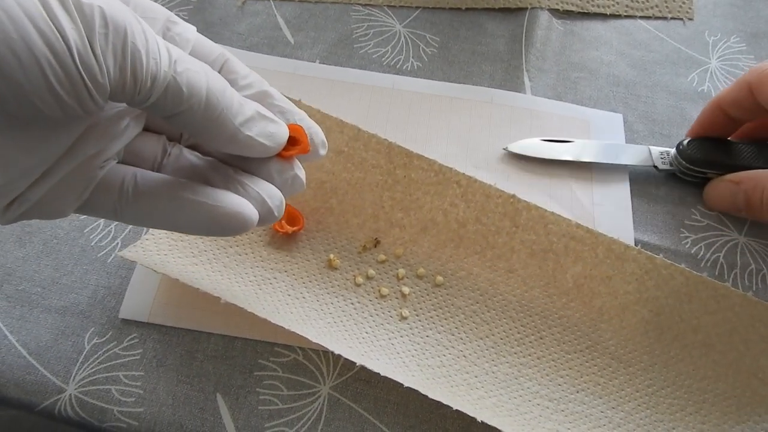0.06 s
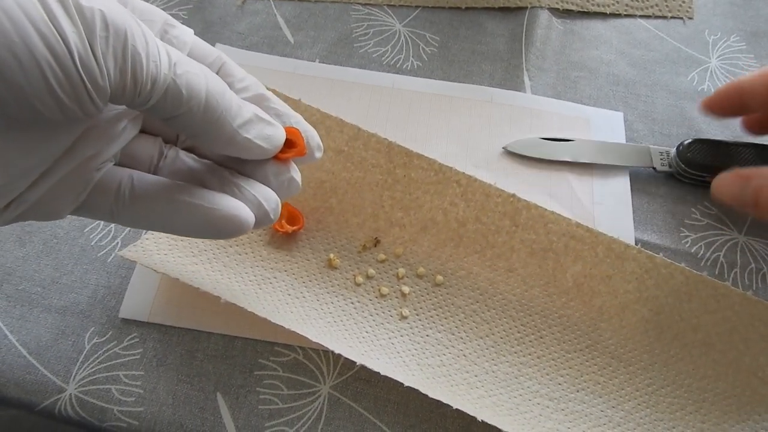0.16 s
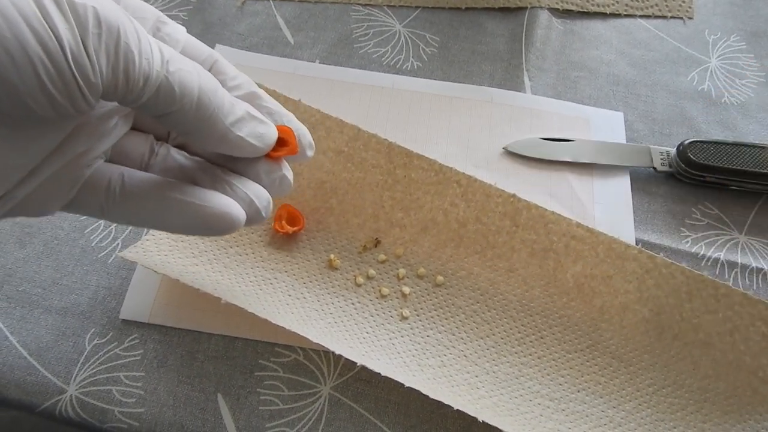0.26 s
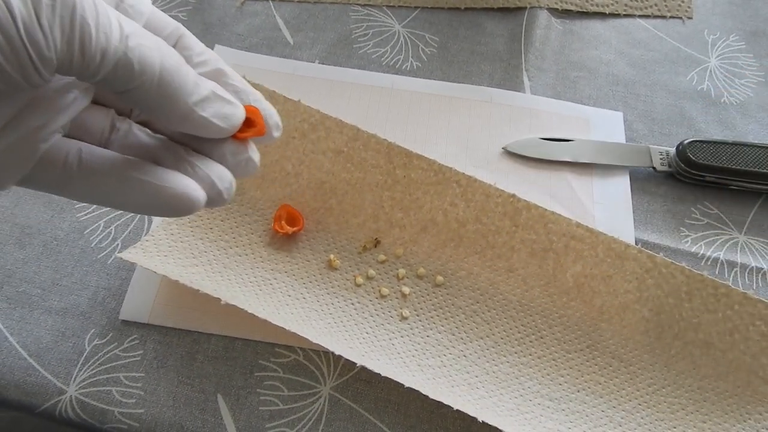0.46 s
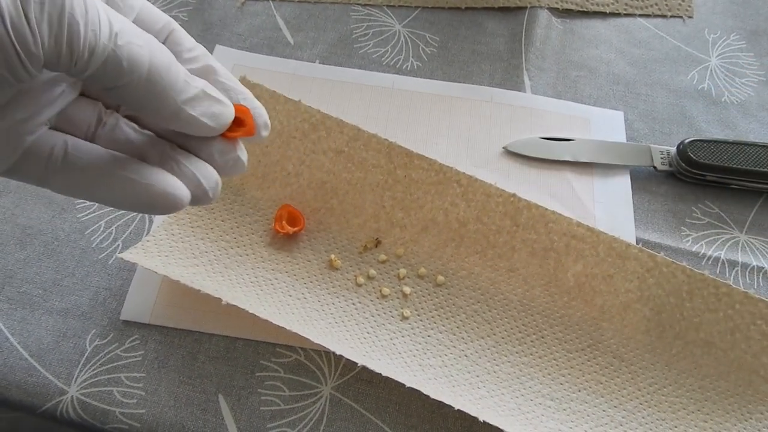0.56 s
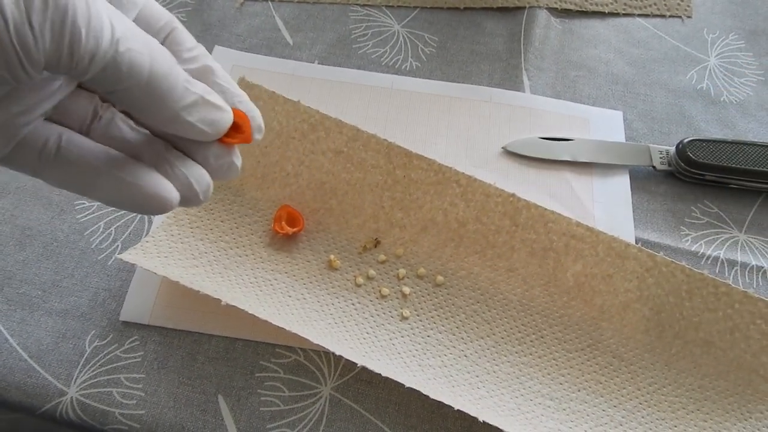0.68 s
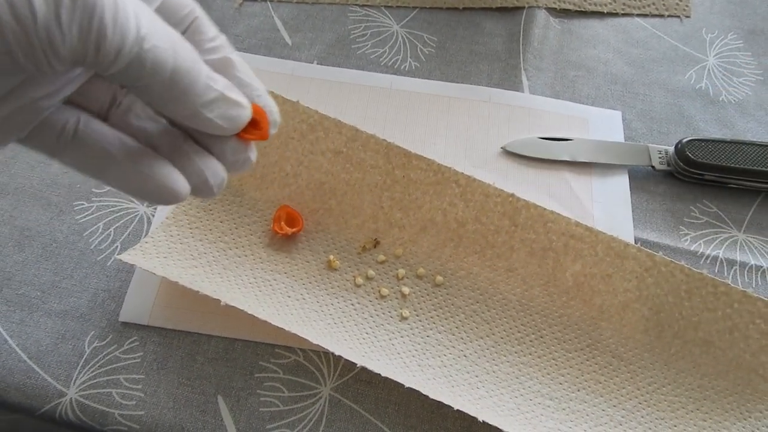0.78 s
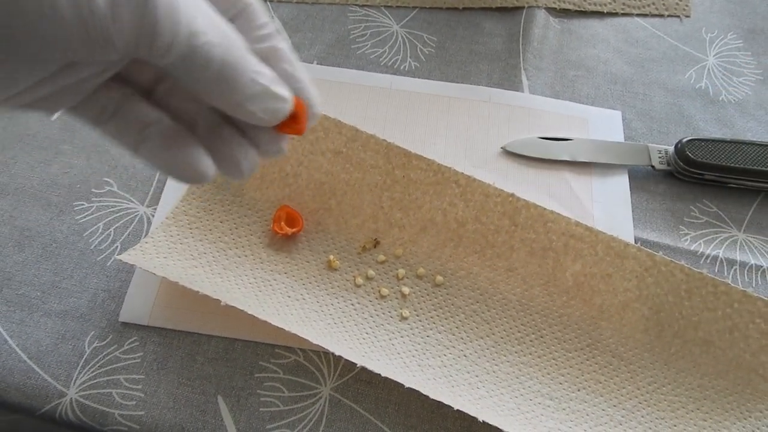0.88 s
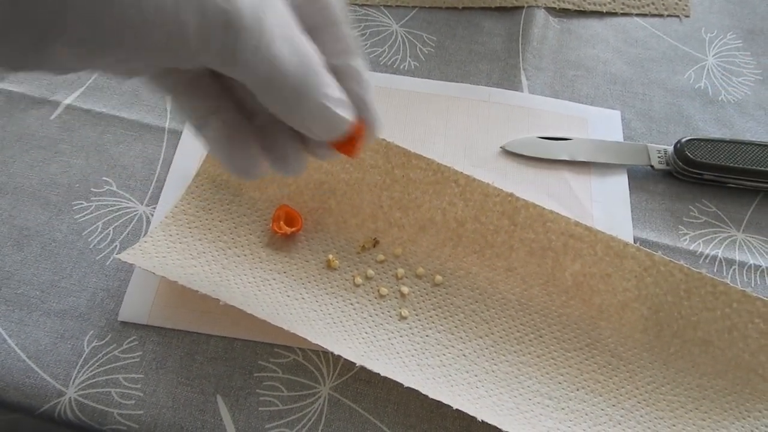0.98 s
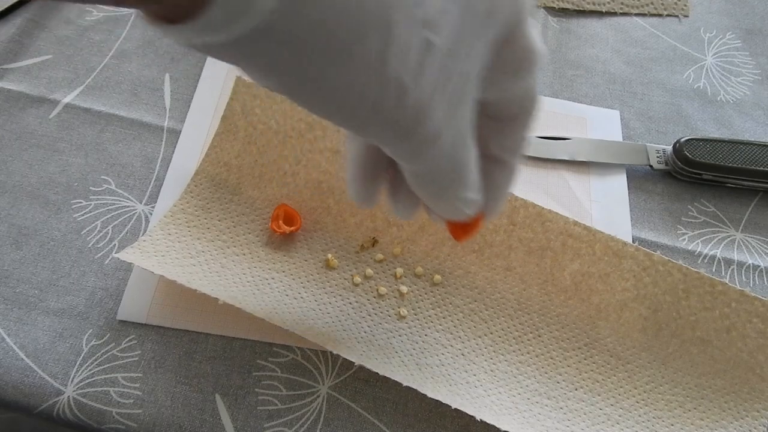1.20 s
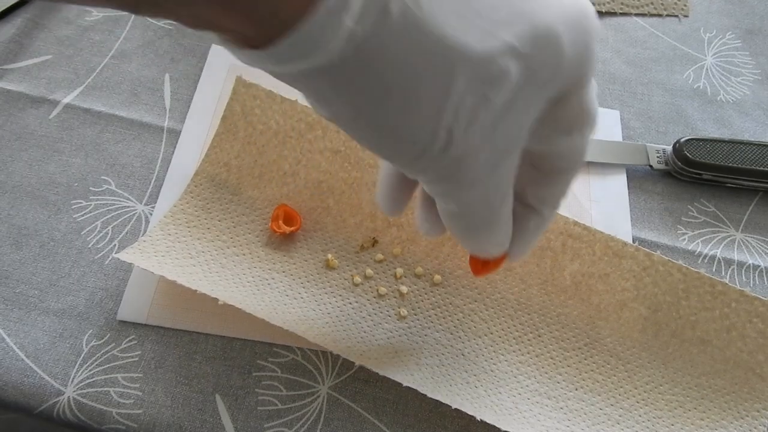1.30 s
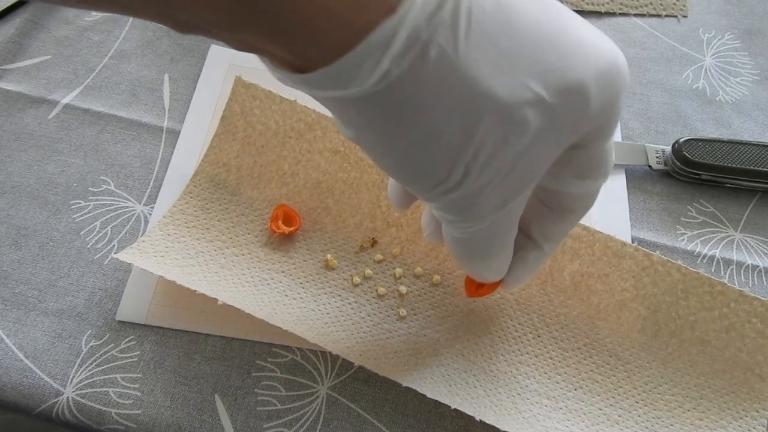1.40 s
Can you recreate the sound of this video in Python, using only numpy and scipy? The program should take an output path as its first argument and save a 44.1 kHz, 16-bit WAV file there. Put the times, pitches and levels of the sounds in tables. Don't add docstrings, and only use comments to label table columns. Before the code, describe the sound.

A folding knife is put down on a cloth-covered wooden table indoors. Light low bumps at 0.05 s, then a hard drop at 0.22 s with rapid rebounds, booming through the microphone's stand and overloading, with short metallic ticks. The low boom fades quickly into a brief room tail. Tiny glove creaks follow from 0.3 to 0.7 s, then quiet hiss, with soft rustling rising after 1.35 s.

```python
import sys
import numpy as np
from scipy import signal
from scipy.io import wavfile

SR = 44100
rng = np.random.default_rng(int(sys.argv[2]) if len(sys.argv) > 2 else 0)


def put_to_file(sound):
    columns = np.atleast_2d(sound).T
    safe = np.clip(columns, -1, 1)
    whole_steps = np.round(safe * 32767)
    wavfile.write(sys.argv[1], SR, whole_steps.astype(np.int16))


def field_ratio(decibels):
    return 10 ** (np.asarray(decibels, dtype=float) / 20)


N = 63945

# (frequency [Hz], level [dB per Hz])
HISS_COLOUR = [(20, -8.5), (40, -4.5), (100, -5.5), (300, -12), (800, -19), (2500, -27), (7000, -32.5),
               (16000, -35.5)]
# (frequency [Hz], likeness [0 to 1])
LEFT_RIGHT_LIKENESS = [(25, .9), (200, 0), (700, 0.066), (2000, .2), (6000, .05), (15000, 0.0)]
# (time [s], level [dB])
HAND_LEVEL = [(0, -65), (.15, -61.5), (.45, -62.5), (.7, -64.5), (1.0, -80), (1.171, -70), (1.3, -69.5),
              (1.38, -57.5), (1.45, -55.5)]
# (frequency [Hz], level [dB per Hz])
RUB_COLOUR = [(30, -24.5), (100, -8.5), (250, -3), (500, 6.5), (1000, -5.5), (2000, -10.5), (4000, -18),
              (9000, -39)]
# (time [s], level [dB], pitch [Hz], pan [dB])
GLOVE_CREAKS = [(.304, -53, 2000, -0.5), (.434, -57, 1890, -8), (.46, -60, 2400, -2),
                (0.484, -56, 2030, -1), (0.525, -50.5, 2141, -9), (.56, -58, 2100, -3), (.6, -61, 2250, -3),
                (.65, -61, 2150, -10), (0.7228, -47.5, 2085, -13), (1.165, -58, 2150, 0.5),
                (1.382, -52.5, 1660, -3)]
# (frequency [Hz], level [dB])
ROOM_COLOUR = [(30, -46), (80, -42.5), (200, -43), (400, -43), (700, -63.5), (1200, -66), (3000, -66),
               (8000, -76)]
# (frequency [Hz], time to fall 60 dB [s])
ROOM_FADE = [(30, 1.2), (100, 0.55), (300, 0.83), (1000, 0.46), (3000, .25), (8000, .2)]
# (time [s], level [dB], pan [dB], dulling [dB per octave])
METAL_TICKS = [
    (.2160, -48, -5, -1.5),
    (.2190, -39.5, -5.5, -1.0),
    (.2252, -39.5, 1, 2),
    (.2310, -52.5, 1, 3.0),
    (.2368, -47.5, 1.5, 3.5),
]
# (frequency [Hz], level [dB], time to fall 60 dB [s])
METAL_TONES = [(650, 10.5, 0.037), (840, 7.5, .02), (1100, 5.5, .015), (1480, 0, 0.022),
               (2150, -9.5, 0.0087), (3240, -8.5, 0.019), (4136, -1.5, 0.011), (5430, 0.5, 0.0037),
               (6900, -7.5, .004), (8900, -4, 0.011), (9300, -7.5, .012), (12120, -14, .004)]
# (time [s], force [dB], direction [+1 push, -1 lift], contact length [ms])
HANDLE_CONTACTS = [
    (.0431, -14.5, 1, .6),
    (.0494, -19, -1, .8),
    (.069, -13, 1, 3.0),
    (.1896, -16, -1, 1.2),
    (.21577, 0, 1, .12),
    (.22216, -2.4, -1, .43),
    (.2324, -7.9, -1, .65),
    (.23635, -8.5, 1, .65),
]
# (frequency [Hz], level [dB], time to fall 60
# dB [s], polarity [+1 or -1], left-right share [-1 to 1])
BOOM_TONES = [(30.4, -35, 1.4, -1, -.03), (50.1, -26.5, .48, -1, 0), (76.8, -19, .6, 1, .23),
              (81.8, -11.1, .3, 1, -.01), (101.6, -5.9, .216, 1, -.1), (124.9, 3.5, .023, -1, -.09),
              (138.5, -11.1, .154, -1, -.25),
              (173.9, -7.9, 0.126, 1, -0.34), (214.9, -7.7, 0.081, -1, -0.02),
               (232.4, -27.0, 0.38, 1, -0.32), (255.6, -3.5, 0.103, -1, 0.24), (286.8, 7.2, 0.053, 1, 0.0),
               (339.6, 1.2, 0.046, -1, -0.04), (350.7, -10.1, 0.115, 1, -0.0),
               (419.1, -8.8, 0.091, 1, 0.04), (429.2, -4.1, 0.028, -1, -0.12),
               (607.8, -29.9, 0.104, 1, -0.81)]


def rms_one(x):
    return x / np.sqrt(np.mean(x ** 2) + 1e-20)


def at_hz(points, hz):
    table_hz, values = np.array(points).T[:2]
    return np.interp(np.log(hz), np.log(table_hz), values)


def pan(db):
    return field_ratio(np.array([[db / 2], [-db / 2]]))


def drift(rate):
    step = 40
    r = np.exp(-2 * np.pi * rate * step / SR)
    slow = signal.lfilter([1], [1, -2 * r, r * r], rng.standard_normal(N // step + 2002))
    slow = slow[2000:]
    return np.interp(np.arange(N) / step, np.arange(len(slow)), rms_one(slow))


def bands():
    edges = 20 * 2 ** np.arange(0, 10, .5)
    white = rng.standard_normal((2, 2, N + 8000))
    for k, (low, high) in enumerate(zip(edges, edges[1:])):
        sos = signal.butter(2, [low, min(high, 19000)], "band", fs=SR, output="sos")
        yield np.sqrt(low * high), signal.sosfilt(sos, white[k % 2])[:, 8000:]


def stereo(pair, alike):
    alike = np.clip(alike, 0, 1)
    middle, side = pair
    return np.sqrt(1 + alike) * middle + np.sqrt(1 - alike) * side * [[1], [-1]]


def shaped(spectrum, patchy_db, rate):
    out = 0
    for hz, pair in bands():
        level_db = at_hz(spectrum, hz) + patchy_db * drift(rate)
        out = out + field_ratio(level_db) * stereo(pair, at_hz(LEFT_RIGHT_LIKENESS, hz))
    return rms_one(out)


def click(s, db, soft_s):
    x = np.zeros(N)
    x[int(s * SR)] = field_ratio(db)
    r = np.exp(-1 / (soft_s * SR))
    return signal.lfilter([(1 - r) ** 2], [1, -2 * r, r * r], x)


def ring(force, hz, t60):
    r = field_ratio(-60 / (t60 * SR))
    w = 2 * np.pi * hz / SR
    return signal.lfilter([0, np.sin(w)], [1, -2 * r * np.cos(w), r * r], force + 1e-18)


def microphone_hiss():
    return field_ratio(-54.5) * shaped(HISS_COLOUR, patchy_db=.4, rate=8.0) * pan(-.4)


def room_tail():
    rise_s, alike = 0.0069, 0.87
    soft_loss_db_per_ms = 15.5
    earlier_s, earlier_db, earlier_dull_db = 0.002, -0.5, 5.5
    t, out = np.arange(N) / SR, 0
    for hz, pair in bands():
        ages = [(np.maximum(t - s, 0), db - soft_loss_db_per_ms * ms) for s, db, _, ms in HANDLE_CONTACTS]
        octaves_up = np.log2(max(hz / 100, 1))
        ages.append((t - earlier_s, earlier_db - earlier_dull_db * octaves_up))
        shape = 0
        for age, db in ages:
            fade = field_ratio(db - 60 * age / at_hz(ROOM_FADE, hz))
            shape = shape + fade * (1 - np.exp(-age / rise_s))
        out = out + field_ratio(at_hz(ROOM_COLOUR, hz)) * shape * stereo(rms_one(pair), alike)
    return out


def hand_rustle():
    hand_db = np.interp(np.arange(N) / SR, *np.transpose(HAND_LEVEL))
    return field_ratio(hand_db) * shaped(RUB_COLOUR, patchy_db=5.5, rate=5.0)


def glove_creaks():
    rise_s, t60_s = 0.0012, 0.015
    t, out = np.arange(N) / SR, 0
    for s, db, hz, side_db in GLOVE_CREAKS:
        age = np.maximum(t - s, 0)
        swell = 1 - np.exp(-age / rise_s)
        fade = field_ratio(db + 6 - 60 * age / t60_s)
        out = out + pan(side_db) * fade * swell * np.sin(2 * np.pi * hz * age)
    return out


def blade():
    mix_db = rng.normal(0, 1.5, (len(METAL_TICKS), len(METAL_TONES)))
    out = 0
    for (s, db, side_db, dull_db), row in zip(METAL_TICKS, mix_db):
        tick = click(s, db, 1e-5)
        metal = 0
        for (hz, level, t60), extra_db in zip(METAL_TONES, row):
            tone_db = level + extra_db - dull_db * np.log2(hz / 2000)
            metal = metal + field_ratio(tone_db) * ring(tick, hz, t60)
        out = out + pan(side_db) * metal
    return out


def table_boom():
    sides = []
    for side, lag_s in ((1, 0.00051), (-1, 9e-5)):
        force = sum(sign * click(s + lag_s, db, ms / 1000) for s, db, sign, ms in HANDLE_CONTACTS)
        boom = 0
        for hz, db, t60, sign, share in BOOM_TONES:
            boom = boom + sign * field_ratio(db) * (1 + side * share) * ring(force, hz, t60)
        sides.append(boom)
    return field_ratio(.9) * np.array(sides)


def scene():
    background = microphone_hiss() + room_tail()
    hand = hand_rustle() + glove_creaks()
    return background + hand + blade() + table_boom()


def band_limit(x):
    return signal.sosfilt(signal.butter(12, 16450, fs=SR, output="sos"), x)


def record(dry):
    clipped = np.clip(dry, -1.0, 1.0)
    top_cut = signal.cheby2(20, 60, 17000, fs=SR, output="sos")
    return band_limit(signal.sosfilt(top_cut, clipped))


dry = scene()
out = record(dry)
put_to_file(out)
```